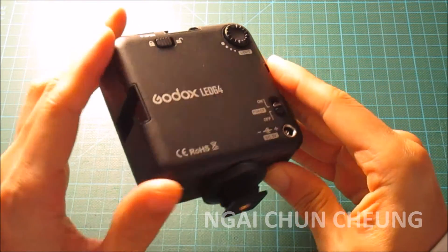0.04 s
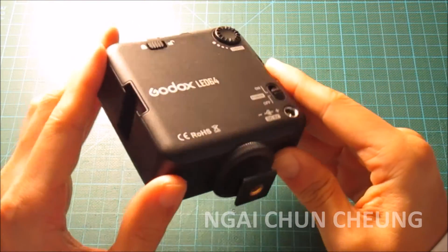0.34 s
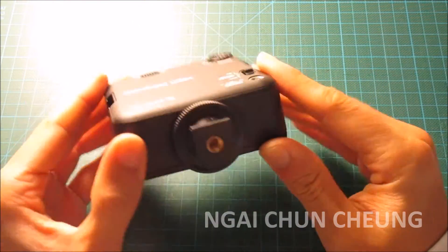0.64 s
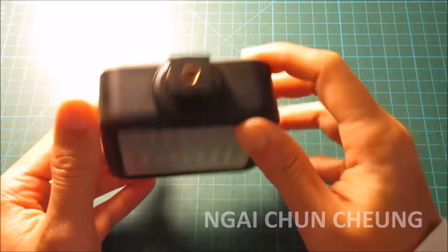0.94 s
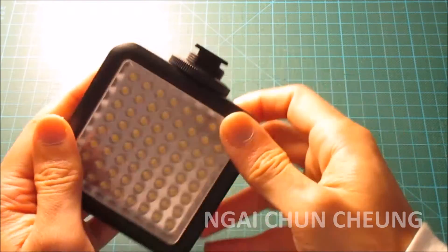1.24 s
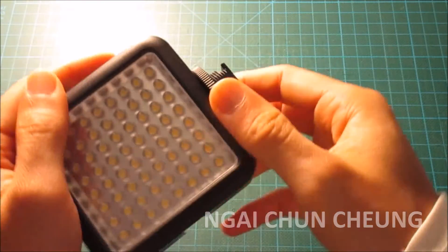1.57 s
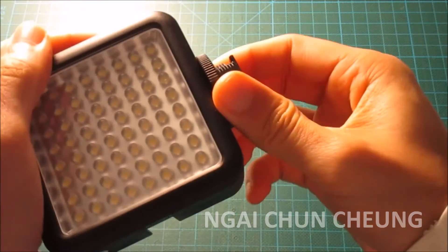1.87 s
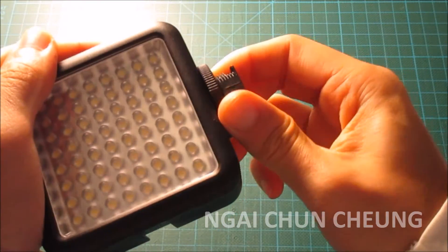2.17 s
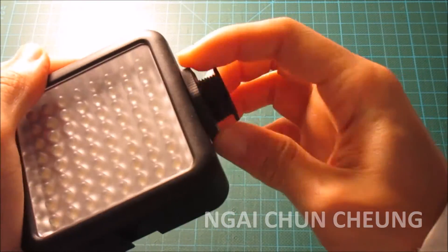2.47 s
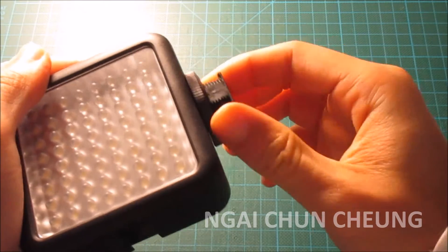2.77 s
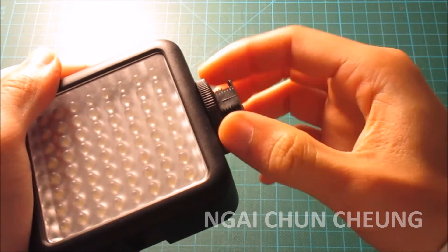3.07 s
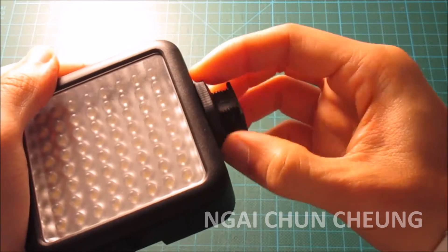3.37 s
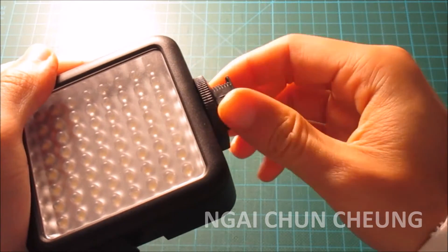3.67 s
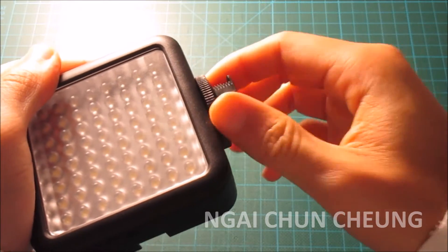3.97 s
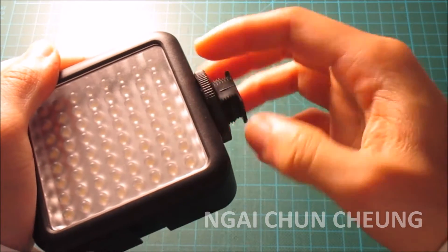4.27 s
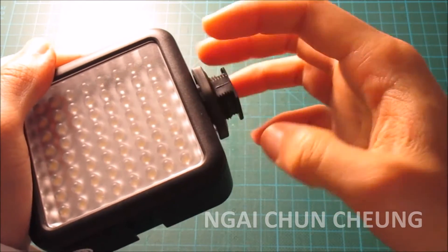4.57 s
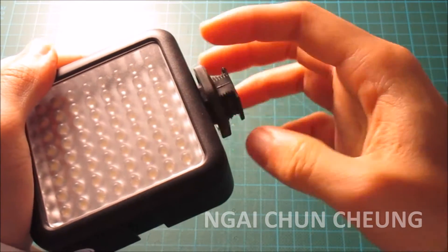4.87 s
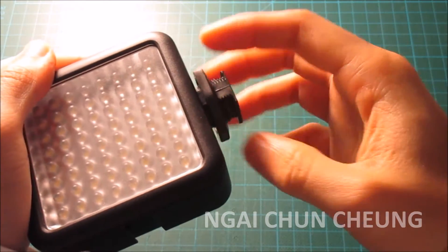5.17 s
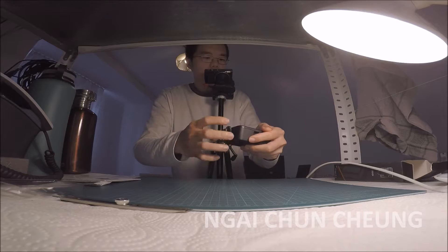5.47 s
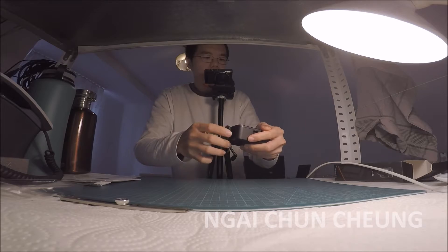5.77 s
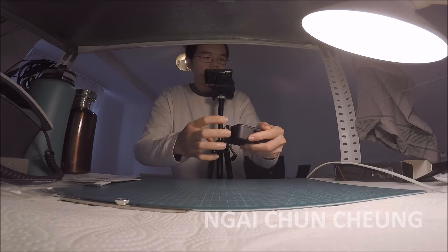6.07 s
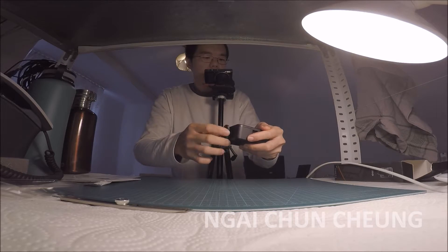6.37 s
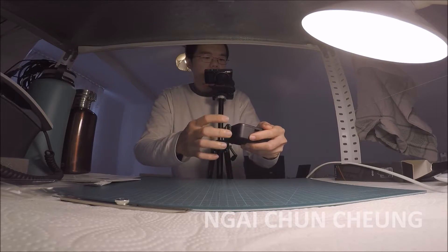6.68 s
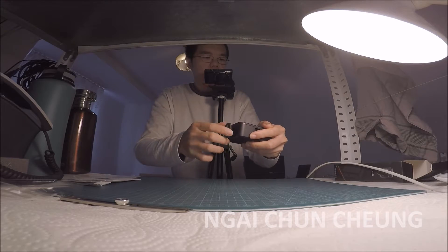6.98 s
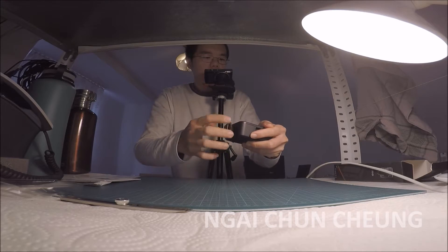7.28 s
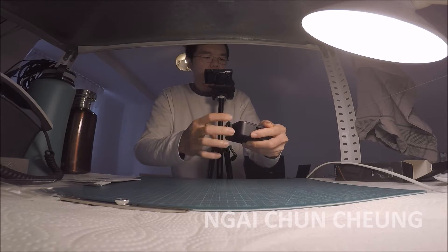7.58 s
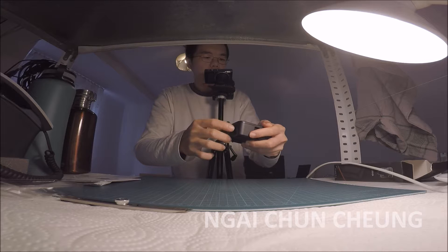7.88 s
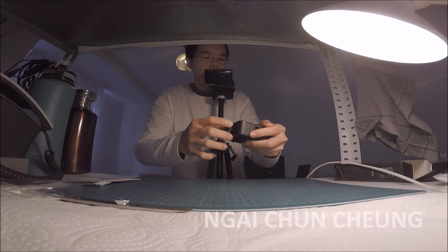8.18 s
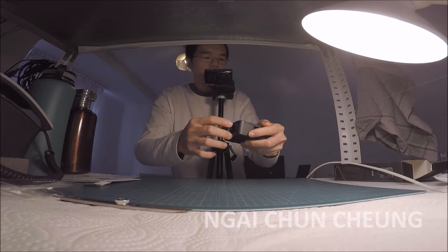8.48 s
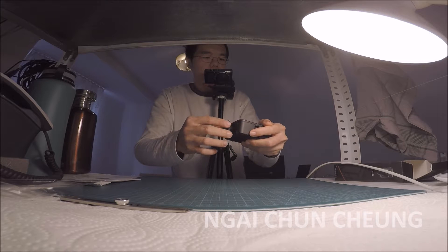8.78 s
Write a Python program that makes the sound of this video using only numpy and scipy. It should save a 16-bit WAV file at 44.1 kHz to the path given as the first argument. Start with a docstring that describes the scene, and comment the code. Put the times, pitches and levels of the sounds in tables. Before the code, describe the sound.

Fingers rub a small plastic lamp and twist its thumb wheel with clicks and scrapes, first close, then duller and farther away.

```python
"""Over a faint hum, close up, fingers rub and pat a small plastic lamp as arms lean on a desk with soft booms.
After 3 s the thumb wheel of its mount knocks in its play and the loose foot snaps against its screw.
From 4.2 s the wheel is twisted in short strokes: the thread scrapes in tiny slips that ring the plastic.
At 5.3 s the perspective jumps across the desk and the twisting carries on, duller and roomier.
Near 8 s a nail skids and the foot snaps again; at last the fingers only shift their hold."""
import sys
import numpy as np
from scipy import signal
from scipy.fft import rfft, irfft
from scipy.io import wavfile
from scipy.ndimage import uniform_filter1d

SR = 44100
rng = np.random.default_rng(int(sys.argv[2]) if len(sys.argv) > 2 else 0)


def pcm_store(signal):
    """Save signal as 16-bit PCM."""
    levels = np.round(np.clip(np.atleast_2d(signal), -1, 1) * 32767)
    wavfile.write(sys.argv[1], SR, levels.astype(np.int16).T)


N = 393372
TIME = np.arange(N) / SR
JUMP_S = 5.305  # the perspective moves from near to far

# The wheel is flicked round and coasts to a stop: start_s, rise_s, fall_s, body_db, treble_db
WHEEL_TURNS = [(4.175, .04, 0.077, -31.5, -46.5), (4.5, 0.01, 0.12, -25.5, -33.5),
               (4.84, 0.041, 0.092, -29.5, -42.5), (5.148, 0.032, 0.11, -29, -38),
               (5.47, 0.074, .22, -41, -53.5), (6.02, 0.12, 0.14, -39, -55.5),
               (6.59, 0.15, 0.17, -40.5, -62), (7.14, 0.079, 0.095, -45, -57),
               (7.535, 0.083, 0.19, -39.5, -51.5), (7.905, 0.094, 0.051, -45, -65)]
# A finger slides over the lamp; the rows at 4.13, 4.415 and 4.465 s are a nail skidding on the wheel: start_s,
# rise_s, fall_s, body_db, treble_db
RUBS = [(0.42, 0.14, .13, -73, -55), (0.655, 0.026, .18, -53.5, -52),
        (0.905, 0.024, .08, -48.5, -44), (1.03, 0.078, .025, -47, -44.5),
        (1.15, 0.046, .23, -47.5, -47), (1.325, .025, .035, -52, -59), (1.38, 0.12, .02, -54, -45.5),
        (1.55, 0.072, .16, -52.5, -58.5), (1.79, 0.015, .07, -56, -53), (2.2, 0.14, .075, -48, -47),
        (2.38, 0.056, .085, -45, -46), (2.51, 0.031, .03, -53, -43.5),
        (3.23, 0.059, .035, -53.5, -50), (3.335, 0.014, .115, -43.5, -45.5),
        (3.48, 0.042, .09, -45, -41.5), (3.68, 0.12, .19, -50, -56), (3.92, 0.19, .16, -50.5, -54),
        (4.13, 0.04, .05, -42, -40), (4.415, 0.029, .01, -32.5, -24), (4.465, .047, .023, -33, -31),
        (4.6, 0.017, .1, -46.5, -75), (4.95, .02, .09, -52, -71), (5.12, 0.031, .03, -39.5, -50.5),
        (7.145, .02, .05, -58, -49), (8.545, 0.016, .035, -55.5, -76), (8.64, 0.032, .04, -51, -76)]
# Stroke envelopes, a body row then a treble row: start_db, stop_db, fall_exponent
TURN_ENVELOPE_NEAR = [(-8, -30.5, 3.34), (-3, -34, 1.55)]
TURN_ENVELOPE_FAR = [(-5.5, -22.5, 2.42), (-1, -37, 0.74)]
RUB_ENVELOPE = [(-7, -10, 0.85), (-17, -17.5, 1)]
# The wheel knocks in its play: time_s, level_db, brightness_db, chatter_s
WHEEL_KNOCKS = [(3.332, -19, -11.5, .005), (3.499, -25, -15, .0056), (3.593, -33, -36, 0.0079),
                (3.628, -30, -24, 0.0082), (3.782, -32, -15, 0.015), (3.886, -26, -26, 0.0036),
                (3.994, -16, -20.5, 0.0023), (4.059, -33, -34, 0.0055), (4.209, -19.5, -14, 0.0086),
                (4.263, -29.5, -23, 0.0028), (4.392, -23, -23, 0.0023), (4.499, -20, -9.5, 0.0033),
                (4.729, -12.5, -15.5, 0.0044), (4.762, -19.5, -15.5, 0.0039), (4.779, -23, -35, 0.0062),
                (4.8, -31, -10, .0033), (4.823, -13.5, -19, 0.008), (4.901, -18.5, -14.5, .0058),
                (5.068, -25.5, -33, 0.0026), (5.093, -18.5, -23, 0.0018), (5.159, -20, -14, 0.0085),
                (5.273, -31, -34, 0.0024), (5.386, -34, -21, 0.0029), (5.417, -35, -19, .0041),
                (5.446, -31, -19, 0.013), (5.468, -22.5, -10, 0.0086), (5.598, -32, -12, 0.011),
                (5.716, -45, -30, 0.005), (6.016, -33, -11, .0027), (6.115, -27.5, -12, 0.0045),
                (6.454, -27, -23.5, 0.0028), (6.484, -29, -23.5, 0.012), (6.518, -29.5, -13.5, 0.0056),
                (6.61, -25, -21.5, 0.003), (6.674, -34, -17, .005), (6.709, -37, -22, .004),
                (6.766, -39, -11, .004), (6.82, -31, -18, 0.0071), (6.847, -31, -24, 0.0078),
                (7.088, -36.5, -24, 0.014), (7.201, -23.5, -21, 0.0076), (7.305, -35.5, -33.5, 0.0046),
                (7.497, -26.5, -16.5, 0.0019), (7.522, -20.5, -22.5, 0.0044), (7.567, -24.5, -21, 0.0049),
                (7.638, -24.5, -27, 0.0025), (7.654, -23, -20, 0.0022), (7.674, -31, -17, 0.0034),
                (7.77, -39, -27, 0.0043), (7.901, -30.5, -19, .004), (7.921, -40, -22, 0.0036)]
# The hard foot snaps against its screw: time_s, level_db, brightness_db, chatter_s
FOOT_SNAPS = [(3.467, -19.5, 0, 0.0036), (3.476, -16.5, -12, 0.0039), (3.521, -27.5, -6.5, 0.0058),
              (4.439, -13.5, -8, 0.0005), (4.511, -10.5, -11.5, 0.0021), (7.99, -23.5, -12.5, 0.0075),
              (8.01, -27.5, -21, .003), (8.65, -40.5, -9, 0.0036)]
# Fingertips land on the shell: time_s, level_db, brightness_db, chatter_s
FINGER_PATS = [(0.211, -45, -6, 0.0015), (1.127, -35, -8, 0.0034), (1.243, -30, -30, 0.0027),
               (2.527, -45, -16, 0.01), (2.924, -28.5, -7.5, 0.0075), (2.937, -30, -5.5, 0.0094),
               (3.137, -39, -3.5, 0.004)]
# Brief thin chirps during the rubbing at 1.08 s and 7.15 s; in the other rows a nail skids on the
# wheel's knurl: start_s, end_s, first_hz, last_hz, level_db
CHIRPS = [(1.08, 1.122, 4130, 4220, -53), (4.165, 4.2, 1940, 1970, -47), (7.15, 7.2, 2000, 2350, -58),
          (7.535, 7.565, 2700, 3240, -54), (7.94, 7.975, 1890, 2440, -53.5),
          (7.962, 7.998, 2610, 2660, -46.5)]

# Broad tone of each kind of contact, near and far: frequency_hz, gain_db
TURN_EQ_NEAR = [(100, -50), (430, -33.5), (560, -12.5), (720, -19), (870, -26.5), (1020, 0), (2200, -11),
                (3000, -19), (4100, -22.5), (4650, -24), (5050, -45), (5700, -22), (8000, -38.5),
                (16000, -48)]
TURN_EQ_FAR = [(100, -48), (380, -27), (530, 4), (750, -2.5), (1100, 2), (1700, -2.5), (2150, -7),
               (2500, -22.5), (3400, -16), (4600, -27.5), (6500, -37), (9000, -64), (16000, -51)]
KNOCK_EQ_NEAR = [(100, -45), (430, -25), (560, -9.5), (720, -21), (860, -18), (980, 1.5), (2300, -4),
                 (3000, -11.5), (4200, -8.5), (4800, -24.5), (5500, -12.5), (9000, -27), (12500, -26),
                 (16000, -48)]
KNOCK_EQ_FAR = [(100, -42), (350, -26), (510, 2), (750, -0.5), (1100, 2), (2200, -6.5), (3000, -19.5),
                (4400, -26.5), (6800, -39.5), (8500, -47.5), (11000, -53), (16000, -57)]
SNAP_EQ_NEAR = [(100, -36), (430, -41), (560, -9.5), (720, -18), (900, -10), (1100, 4.5), (1400, -3.5),
                (2400, -1.5), (3000, -1.5), (4000, 0.5), (5500, 2), (8000, -7.5), (12500, -16),
                (16000, -28)]
SNAP_EQ_FAR = [(100, -48), (380, -15), (520, -2), (1000, 1), (2200, 0.5), (3000, -7), (4400, -15),
               (5400, -16.5), (7000, -26.5), (9000, -39), (16000, -54)]
RUB_EQ_NEAR = [(100, -31), (430, -12), (580, 4), (720, -8), (1000, 2.5), (2400, -2), (3100, -8.5),
               (4100, -12), (4800, -16.5), (5600, -10), (8000, -8), (8700, -14), (11000, -13), (16000, -28)]
RUB_EQ_FAR = [(100, -37.5), (380, -32), (540, 6), (700, -10), (900, -3), (1200, -14), (2300, -22),
              (3500, -17), (7000, -34), (16000, -55)]
# Resonances and dead spots of the plastic shell: centre_hz, width_hz, lift_db
SHELL_MODES_NEAR = [(550, 80, 7), (990, 45, 3), (1090, 50, 8), (1200, 90, -14), (1300, 40, 5),
                    (1385, 50, 9), (1525, 40, 4), (1670, 28, 7), (1770, 40, 4), (1920, 50, -12),
                    (2075, 40, 5), (2180, 40, 6), (2270, 40, 6), (2515, 35, 4), (2980, 120, -10),
                    (3440, 55, 5), (3720, 70, 5), (4080, 70, 6), (5760, 90, 6)]
SHELL_MODES_FAR = [(560, 55, 5), (965, 35, 4), (1130, 42, 14), (1430, 45, 9), (1570, 90, -8), (1890, 50, 7),
                   (2170, 70, 8), (2670, 30, 7), (3170, 45, 8), (3750, 60, 4), (6130, 60, 7)]
# Resonances of the metal screw, the foot and the shell's flat panels: centre_hz, width_hz, lift_db
SCREW_MODES = [(6160, 90, 13), (6540, 50, 7), (7450, 70, 6), (10600, 60, 16), (11750, 120, 17),
               (14800, 200, 7)]
FOOT_MODES_NEAR = [(2080, 60, 2), (5830, 100, 4), (8830, 220, 15), (11900, 300, 5)]
FOOT_MODES_FAR = [(1290, 50, 7), (1890, 45, 9), (2190, 60, 10), (2660, 50, 5), (3550, 90, 7),
                  (7500, 200, 10)]
PANEL_MODES = [(2400, 300, 7), (4150, 150, 3), (5680, 220, 6)]
# Bands that the desk's echo cancels close up: centre_hz, width_hz, share_removed
DESK_NOTCHES = [(700, 100, .45), (4760, 300, .65)]

# The arms lean on the desk: peak_s, length_s, level_db
ARM_LEANS = [(1.506, 0.16, -38), (1.736, 0.33, -46.5), (2.2, .3, -59), (3.064, 0.43, -50.5),
             (4.106, 0.061, -51), (5.59, 0.65, -60), (6.274, 0.31, -43.5), (6.786, 0.093, -49)]
# Tone of the desk's rumble: frequency_hz, gain_db
DESK_EQ = [(10, -15), (22, 2.5), (33, -20), (47, 13), (62, -12.5), (90, -36), (200, -57), (500, -100)]
# Reverb time of the small room: frequency_hz, t60_s
ROOM_DECAY = [(200, 0.284), (1000, 0.24), (4000, 0.17), (14000, 0.07)]
# Colour of the room tone: frequency_hz, gain_db
AIR_EQ_NEAR = [(20, 7), (70, 7), (135, 6.5), (160, 1), (420, -5.5), (580, -7), (730, -14), (960, 0.5),
               (1300, -10.5), (2300, -12), (4200, -20), (4800, -20.5), (5700, -19.5), (8500, -19),
               (16000, -33.5)]
AIR_EQ_FAR = [(20, 7.5), (70, 0), (130, -1.5), (165, -9.5), (380, -16.5), (550, -13), (700, -16.5),
              (1100, -20.5), (3500, -24.5), (7000, -31.5), (11000, -36), (15200, -37.5), (16000, -65)]
# Steady background hum: pitch_hz, level_db
HUM_TONES_NEAR = [(132, -66), (349, -69), (499, -68.5), (7900, -82)]
HUM_TONES_FAR = [(527.6, -66.5), (807.5, -78)]


def scrape(strokes, envelopes, rings, slips_per_s, spread_db, hiss, grip_db, grip_hz, body_db, treble_db):
    """Thread, skin or nail: tiny uneven slips over a smooth hiss ring the shell as the grip wavers."""
    slipping = rng.random(N) < slips_per_s / SR
    sizes = amp(spread_db * np.minimum(rng.exponential(1, N), 3))
    slips = unit(slipping * sizes * rng.choice([-1, 1], N))
    friction = slips + hiss * rng.standard_normal(N)
    force = unit(friction * amp(grip_db * drift(grip_hz)))
    out = np.zeros(N)
    for band, (ring, db) in enumerate(zip(rings, (body_db, treble_db))):
        swells = stroke_swells(strokes, band, *envelopes[band])
        out += amp(db) * signal.oaconvolve(force * swells, ring)[:N]
    return out


def stroke_swells(strokes, band, start_db, stop_db, fall_exponent, touch_s=0.0093):
    """Each stroke swells to its fastest moment, then dies away; band 0 is the body, 1 the treble."""
    out = np.zeros(N)
    for start_s, rise_s, fall_s, *levels_db in strokes:
        t = np.arange(0, rise_s + fall_s, 1 / SR)
        attack_db = start_db * np.clip(1 - t / rise_s, 0, 1)
        release_db = stop_db * np.clip((t - rise_s) / fall_s, 0, 1) ** fall_exponent
        contact = np.minimum(np.minimum(t, t[-1] - t) / touch_s, 1)
        add(out, start_s, contact * amp(levels_db[band] + attack_db + release_db))
    return out


def clicks(hits, rings, body_db, treble_db, rise_share, treble_life, slide_db, slide_s, settle_db, settle_s):
    """Parts slide together, chatter for a few ms and settle; treble_life under 1 shortens the treble."""
    out, size = np.zeros(N), 4096
    t = (np.arange(size) - size // 8) / SR
    after = np.maximum(t, 0)
    slide = amp(slide_db) * np.exp(-abs(t) / slide_s)
    settle = amp(settle_db) * np.exp(-after / settle_s)
    for time_s, level_db, brightness_db, chatter_s in hits:
        contacts = rng.standard_normal(size)
        chatter_s = max(chatter_s, .001)
        attack = (1 - np.exp(-after / (rise_share * chatter_s))) ** 2
        for ring, band_db, life in zip(rings, (body_db, brightness_db + treble_db), (1, treble_life)):
            chatter = np.exp(-after / (chatter_s * life))
            force = slide + attack * (chatter + settle)
            click = signal.fftconvolve(contacts * force, ring)[:size]
            peak_rms = np.sqrt(uniform_filter1d(click ** 2, size=256).max())
            add(out, time_s + t[0], amp(level_db + band_db) * click / peak_rms)
    return out


def thin_chirps(cues, jitter, overtone_db):
    """Short rough chirps with a rising, unsteady pitch."""
    out = np.zeros(N)
    wobble = 1 + jitter * drift(400)
    for start_s, end_s, first_hz, last_hz, level_db in cues:
        size = round((end_s - start_s) * SR)
        pitch_hz = np.linspace(first_hz, last_hz, size) * wobble[round(start_s * SR):][:size]
        cycles = np.cumsum(pitch_hz) / SR
        buzz = sum(amp(overtone_db * k) * np.sin(2 * np.pi * (k + 1) * cycles) for k in range(4))
        add(out, start_s, amp(level_db) * unit(buzz * np.hanning(size)))
    return out


def lamp_rings(eq, modes, crossover_hz=3000, size=8192):
    """The lamp's ring after one slip, split into a body band and a treble band of equal energy."""
    hz = abs(np.fft.fftfreq(size, 1 / SR))
    lifts = [1 + (amp(db) ** 2 - 1) / (1 + (2 * (hz - centre) / width) ** 2) for centre, width, db in modes]
    gain = amp(curve_at(eq, hz)) * np.sqrt(np.prod(lifts, axis=0))
    body_share = 1 / (1 + (hz / crossover_hz) ** 12)
    rings = []
    for share in (body_share, 1 - body_share):
        log_gain = np.log(gain * np.sqrt(share) + 1e-5)
        minimum_phase = np.exp(np.conj(signal.hilbert(log_gain)))  # no ring ahead of the hit
        ring = np.fft.ifft(minimum_phase).real[:size // 2]
        rings.append(ring / np.linalg.norm(ring))
    return rings


def lamp_near():
    """Close up: bright, dry clicks, the scraping thread, and skin and nail sliding on the shell."""
    thread_rings = lamp_rings(TURN_EQ_NEAR, SHELL_MODES_NEAR + SCREW_MODES)
    knock_rings = lamp_rings(KNOCK_EQ_NEAR, SHELL_MODES_NEAR + SCREW_MODES[:1])
    snap_rings = lamp_rings(SNAP_EQ_NEAR, SHELL_MODES_NEAR + FOOT_MODES_NEAR)
    skin_rings = lamp_rings(RUB_EQ_NEAR, SHELL_MODES_NEAR + PANEL_MODES)
    knocks = clicks(near_cues(WHEEL_KNOCKS), knock_rings, body_db=-9, treble_db=-3, rise_share=0.19,
                    treble_life=0.55, slide_db=-6.5, slide_s=0.00084, settle_db=-14, settle_s=0.013)
    snaps = clicks(near_cues(FOOT_SNAPS), snap_rings, body_db=-9, treble_db=-4, rise_share=0.054,
                   treble_life=1, slide_db=-17.5, slide_s=0.0081, settle_db=-25, settle_s=0.0066)
    pats = clicks(FINGER_PATS, skin_rings, body_db=-7.5, treble_db=-9, rise_share=0.99,
                  treble_life=0.64, slide_db=-23, slide_s=0.011, settle_db=-23, settle_s=0.0075)
    thread = scrape(near_cues(WHEEL_TURNS), TURN_ENVELOPE_NEAR, thread_rings, slips_per_s=550,
                    spread_db=3, hiss=0.46, grip_db=2, grip_hz=70, body_db=-1.5, treble_db=-3.5)
    skin = scrape(near_cues(RUBS), RUB_ENVELOPE, skin_rings, slips_per_s=1100,
                  spread_db=2, hiss=1, grip_db=3, grip_hz=39.8, body_db=-1.5, treble_db=-2)
    chirps = thin_chirps(near_cues(CHIRPS), jitter=0.025, overtone_db=-17)
    return knocks + snaps + pats + thread + skin + chirps


def lamp_far():
    """Across the desk: the same handling with softer attacks and a duller top end."""
    thread_rings = lamp_rings(TURN_EQ_FAR, SHELL_MODES_FAR)
    knock_rings = lamp_rings(KNOCK_EQ_FAR, SHELL_MODES_FAR)
    snap_rings = lamp_rings(SNAP_EQ_FAR, FOOT_MODES_FAR)
    skin_rings = lamp_rings(RUB_EQ_FAR, SHELL_MODES_FAR)
    knocks = clicks(far_cues(WHEEL_KNOCKS), knock_rings, body_db=-12, treble_db=-7, rise_share=0.55,
                    treble_life=0.74, slide_db=-10, slide_s=0.0034, settle_db=-29, settle_s=0.022)
    snaps = clicks(far_cues(FOOT_SNAPS), snap_rings, body_db=-9.5, treble_db=-6.5, rise_share=0.3,
                   treble_life=0.8, slide_db=-6, slide_s=0.0055, settle_db=-24, settle_s=0.018)
    thread = scrape(far_cues(WHEEL_TURNS), TURN_ENVELOPE_FAR, thread_rings, slips_per_s=400,
                    spread_db=2.5, hiss=0.9, grip_db=2.3, grip_hz=70, body_db=-1.5, treble_db=-5)
    skin = scrape(far_cues(RUBS), RUB_ENVELOPE, skin_rings, slips_per_s=750,
                  spread_db=2, hiss=0.44, grip_db=3.5, grip_hz=30, body_db=1.5, treble_db=-8)
    chirps = thin_chirps(far_cues(CHIRPS), jitter=0.092, overtone_db=-16)
    return knocks + snaps + thread + skin + chirps


def desk_rumble(rest_db=-59):
    """A low rumble that swells into a soft boom each time the arms lean."""
    swells = sum(amp(db) * np.exp(-(2 * (TIME - s) / length) ** 2) for s, length, db in ARM_LEANS)
    return (amp(rest_db) + swells) * noise(DESK_EQ)


def desk_notches(x):
    """The desk's echo partly cancels two narrow bands."""
    for hz, width, share in DESK_NOTCHES:
        x = x - share * signal.lfilter(*signal.iirpeak(hz, hz / width, SR), x)
    return x


def in_room(x, air_eq, reverb_db, air_db, size=16384):
    """Adds room tone and a small room's sparse reflections, each band dying at its own speed."""
    taps = rng.standard_normal(size) * (rng.random(size) < .1)
    taps *= np.arange(size) > .006 * SR  # pre-delay
    hz, t, bands = signal.stft(taps, SR, nperseg=256)
    decay = amp(-60 * t / curve_at(ROOM_DECAY, hz)[:, None])
    tail = signal.istft(bands * decay, SR, nperseg=256)[1]
    reverb = signal.oaconvolve(x, tail / np.linalg.norm(tail))[:N]
    return x + amp(reverb_db) * reverb + amp(air_db) * noise(air_eq)


def hum(tones, waver_rad, flutter_db):
    """Faint tones that waver a little in pitch and level."""
    out = np.zeros(N)
    for pitch_hz, level_db in tones:
        tone = np.sin(2 * np.pi * pitch_hz * TIME + waver_rad * drift(7.1))
        out += amp(level_db) * unit(tone * amp(flutter_db * drift(12)))
    return out


def noise(eq):
    """Steady coloured noise of rms 1."""
    gain = amp(curve_at(eq, np.fft.rfftfreq(N, 1 / SR)))
    return unit(irfft(rfft(rng.standard_normal(N)) * gain, N))


def drift(hz):
    """Random modulation of rms 1, up to about hz."""
    f = np.fft.rfftfreq(N, 1 / SR)
    return unit(irfft(rfft(rng.standard_normal(N)) / (1 + (f / hz) ** 4), N))


def near_cues(rows):
    """The events heard close up."""
    return [row for row in rows if row[0] < JUMP_S]


def far_cues(rows):
    """The events heard from across the desk."""
    return [row for row in rows if row[0] >= JUMP_S]


def amp(db):
    """Decibels to gain."""
    return 10 ** (np.asarray(db) / 20)


def unit(x):
    """Scales to rms 1."""
    return x / np.sqrt(np.mean(x ** 2) + 1e-20)


def curve_at(points, hz):
    """Reads a curve on a log-frequency axis."""
    f, value = np.transpose(points)
    return np.interp(np.log(hz + 1), np.log(f + 1), value)


def add(mix, start_s, sound):
    """Mixes a sound in at start_s."""
    part = mix[max(round(start_s * SR), 0):][:len(sound)]
    part += sound[:len(part)]


def scene():
    """The near perspective, then the far one, over the rumble of the desk."""
    near = desk_notches(in_room(lamp_near(), AIR_EQ_NEAR, reverb_db=-17.5, air_db=-50))
    near += hum(HUM_TONES_NEAR, waver_rad=0.4, flutter_db=1.5)
    far = in_room(lamp_far(), AIR_EQ_FAR, reverb_db=-15, air_db=-56)
    far += hum(HUM_TONES_FAR, waver_rad=0.99, flutter_db=4.9)
    crossfade = np.clip((TIME - JUMP_S) / .005, 0, 1)
    return ((1 - crossfade) * near + crossfade * far + desk_rumble())[None]


def record(dry, cutoff_hz=15900):
    """A steep low-pass trims the very top of the mix."""
    lowpass = signal.firwin(511, cutoff_hz, window=("kaiser", 9), fs=SR)
    return signal.oaconvolve(dry, lowpass[None], "same")


dry = scene()
out = record(dry)
pcm_store(out)
```